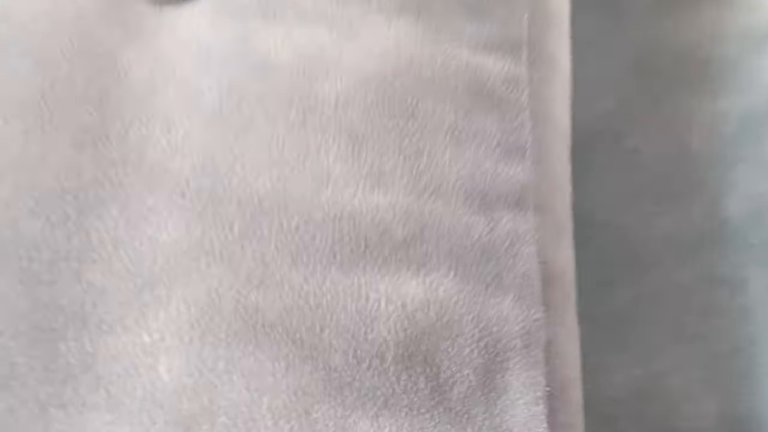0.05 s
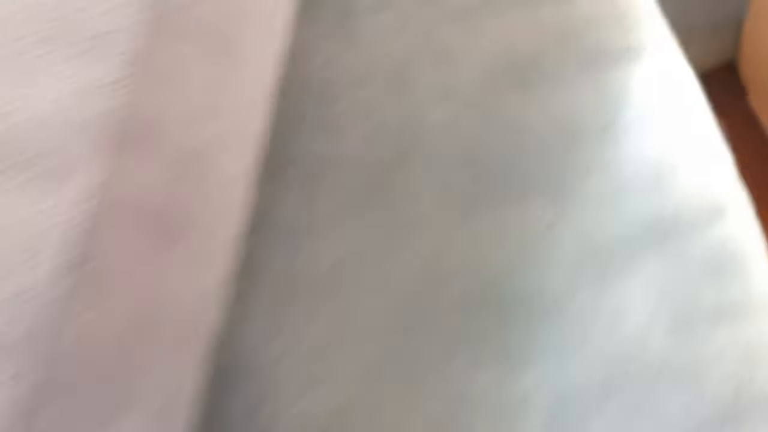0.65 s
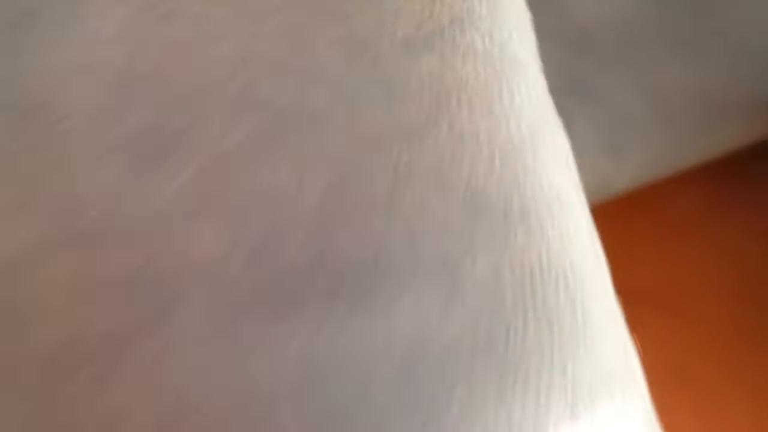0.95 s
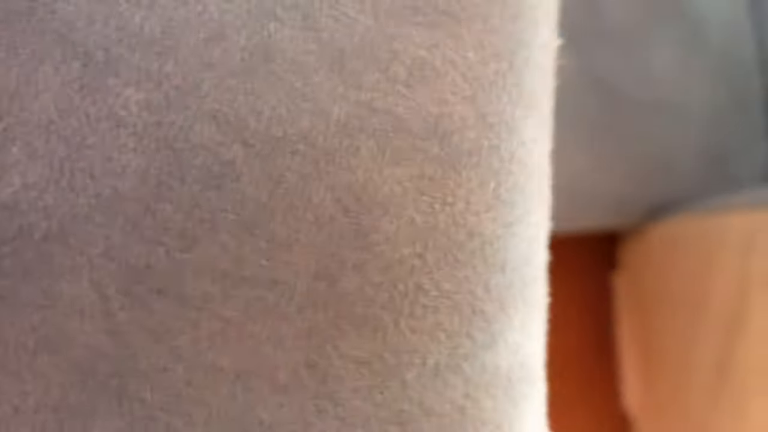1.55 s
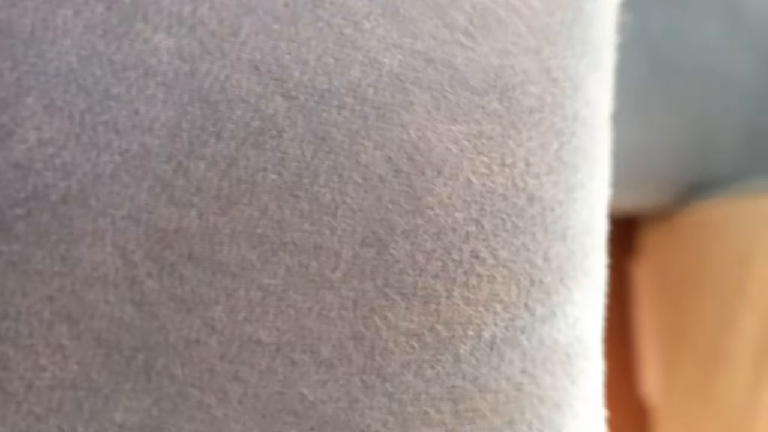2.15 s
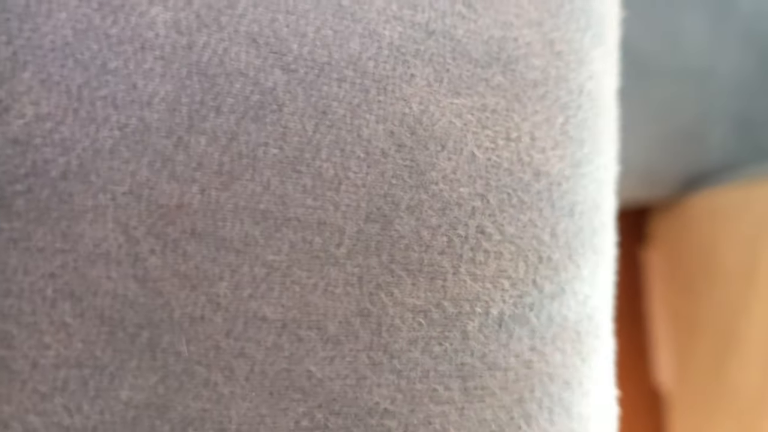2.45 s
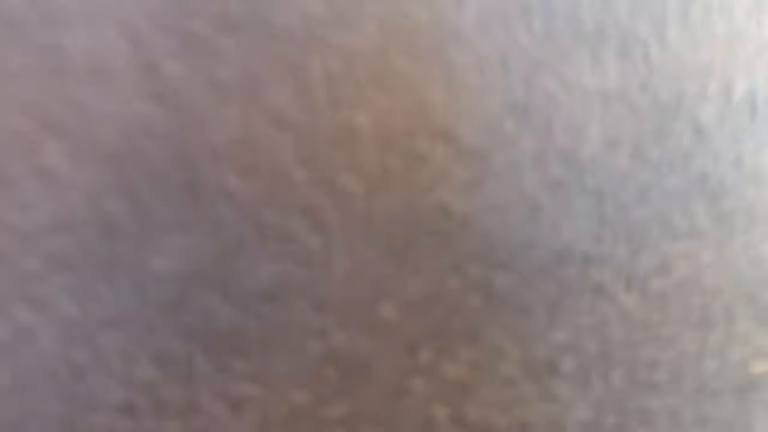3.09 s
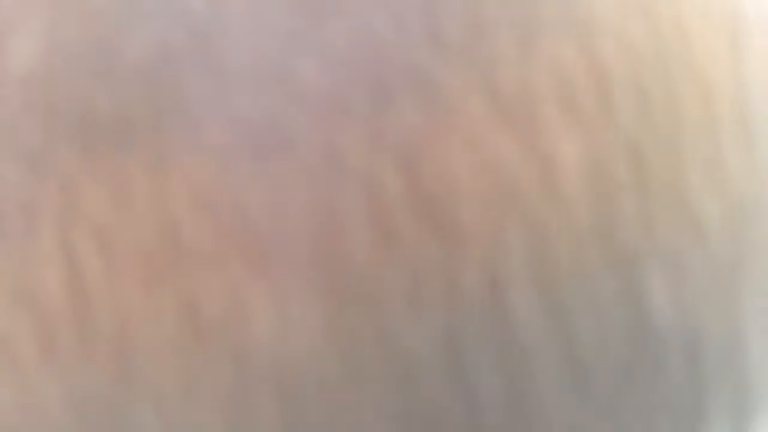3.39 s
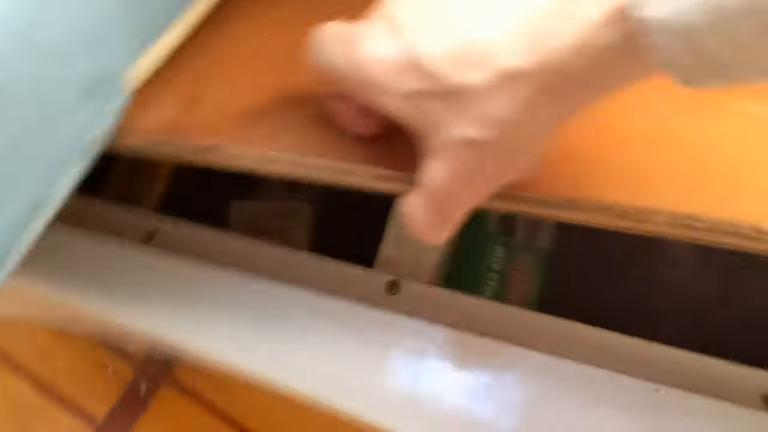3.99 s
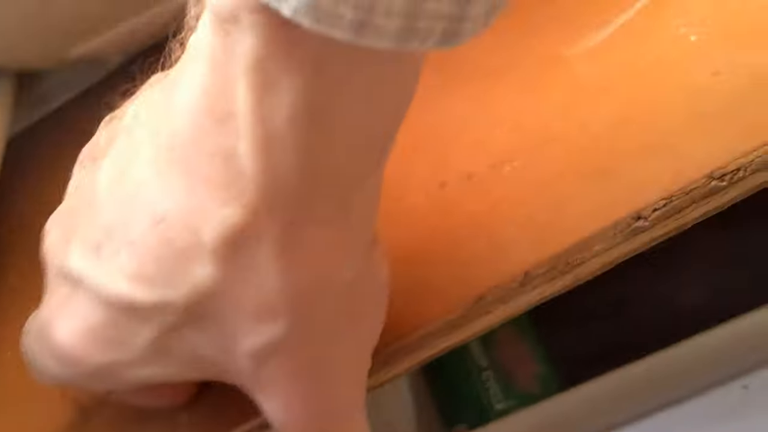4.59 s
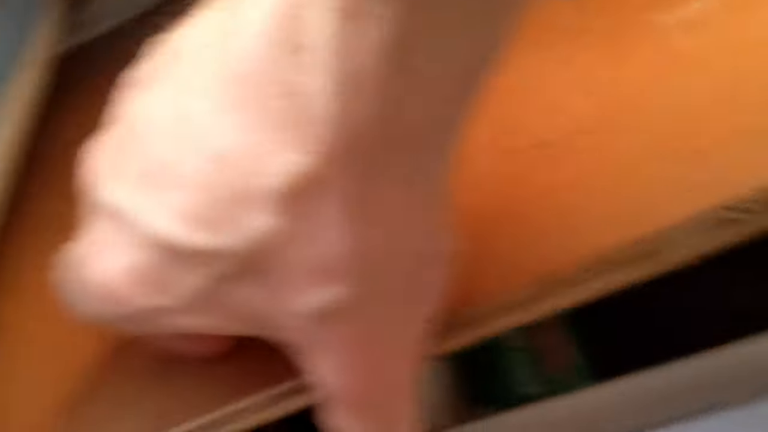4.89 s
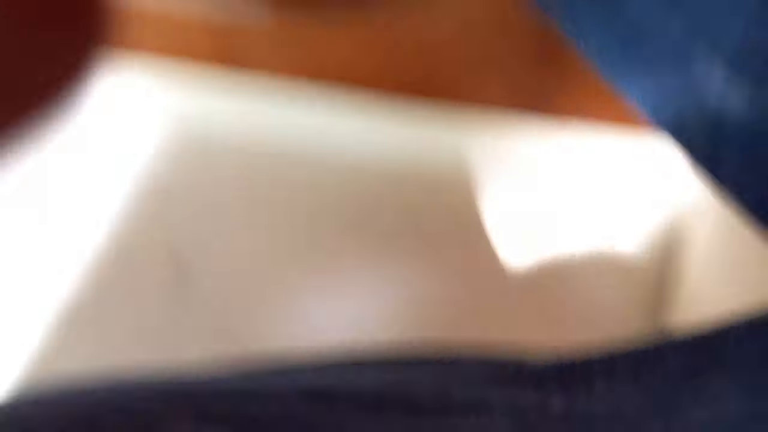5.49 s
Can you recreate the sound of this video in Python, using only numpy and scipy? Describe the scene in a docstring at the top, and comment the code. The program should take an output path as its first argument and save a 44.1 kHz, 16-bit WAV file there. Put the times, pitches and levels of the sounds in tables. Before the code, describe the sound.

Fingers tap and suede brushes close to the microphone while a plywood cover knocks and scrapes in a small boat cabin.

```python
"""A small boat cabin: a hand-held phone brushes past a suede cushion while a plywood locker cover
is pulled up. Fingers tap, tick and slip on the phone's case, ringing it close to the microphone.
The cover knocks and scrapes in its frame, the hollow under it booms and the cabin answers briefly.
Suede hisses over the microphone ports, the cushion rustles and the moving hand adds a low rumble."""
import sys
import numpy as np
from scipy import signal
from scipy.fft import rfft, irfft, next_fast_len
from scipy.io import wavfile
from scipy.ndimage import uniform_filter1d

SR = 44100
rng = np.random.default_rng(int(sys.argv[2]) if len(sys.argv) > 2 else 0)


def to_wav(sig):
    """Store sig (one row per channel, or 1-D mono) as 16-bit WAV at the path in sys.argv[1].

    Samples outside -1..1 are clipped; the rate is SR.
    """
    pcm = np.clip(np.atleast_2d(sig), -1, 1) * 32767
    pcm = np.round(pcm).astype(np.int16)
    wavfile.write(sys.argv[1], SR, pcm.T)  # frames by channels


N = 253089
T = np.arange(N) / SR

# Levels are relative trims; pan is left minus right.
# finger taps on the case: t/s, thud/dB, hollow/dB, clack/dB, clack tilt/(dB per octave), pan/dB
FINGER_TAPS = [(0.215, -23, -32, -58, 0, 3), (1.081, -13, -11.5, -5, -2.5, 3.5),
               (1.585, -56, -61, -37.5, 3, 9), (1.967, -56, -42, -32.5, -7, 5),
               (2.657, -25, 1, -11, -12.5, 8.5), (2.677, -24, -33, -49, -6, 5),
               (2.684, -35, -28, -34, -7, 5), (2.709, -31, -33, -21, -7, 4), (2.757, -44, -33, -21, -10, 4),
               (2.767, -45, -33, -35, -4, 10), (4.178, -48, -50, -23.5, 9, 9),
               (4.183, -25, -48, -12, 1.5, 2), (4.198, -13.5, -28, -9.5, -3.5, 6),
               (4.21, -48, -36, -32, 0, 9), (4.252, -28.5, -58, -50, 0, 18),
               (4.383, -9, -27, -10, -2.5, 6.5), (4.52, -35, -51, -29, 2, 4.5),
               (4.56, -25, -45, -35, -6, 12), (4.68, -32, -59, -33.5, -5, 7),
               (4.786, -30.5, -57, -20, 2, 5), (4.91, -40, -53, -35, 0, 0), (4.921, -33, -39, -31, -7, 6),
               (5.307, -26.5, -35, -37, -6, 8), (5.39, -21, -46, -23, 7, 6),
               (5.435, -13.5, -48, -22.5, 0.5, 9.5), (5.593, -43.5, -47, -24.5, 4, 7),
               (5.626, -12.5, -22.5, -22.5, 1, 10)]
# modes of the case: f/Hz, level/dB, t60/s, voice (0 thud, 1 hollow, 2 clack)
CASE_MODES = [(164, -7, 0.045, 0), (247, 4.5, 0.017, 0), (513, -4.5, 0.015, 1), (683, -15, 0.016, 1),
              (843, 0.5, 0.012, 2), (1414, 4, 0.0089, 2), (1810, 4, 0.0072, 2)]
# nails and seams catching the rim: t/s, level/dB, body/dB, edge/dB, top/dB, pan/dB
RIM_TICKS = [(0.8139, -21, -3, -19.5, -36, 3.5), (2.7085, -19, -8, -19, -44, -9),
             (2.7134, -33, -3.5, -14, -28, -13), (2.7229, -32, -7, -13, -31, -14),
             (2.7278, -29.5, -12, -7.5, -32, -7), (2.756, -29.5, -6.5, -19, -43, -12),
             (3.5679, -30, -3, -16, -18, 9), (3.867, -19, -0.5, -11.5, -18.5, 1),
             (3.905, -31, -18, -28, -11, 3.5), (4.1832, -17.5, -6.5, -15, -31, 17),
             (4.1973, -27.5, -9, -12.5, -25, 21), (4.3829, -16.5, -17, -20, -22, 9.5),
             (4.408, -23.5, -35, -10, -27, 8), (4.9213, -11, -35, -16, -20.5, 14)]
# modes of the case's rim: f/Hz, t60/s, voice (0 body, 1 edge, 2 top)
RIM_MODES = [(2200, 0.0019, 0), (3680, 0.0032, 0), (3900, 0.0022, 0), (5570, 0.0058, 1), (7340, 0.0042, 1),
             (9870, 0.0053, 2), (11700, 0.0049, 2), (14500, 0.0033, 2)]
# the cover hitting its frame: t/s, level/dB, boom/dB, clap/dB, crack/dB, pan/dB
COVER_KNOCKS = [(0.35, -34, -3, -24, -3, 0), (0.582, -29.5, -35, -12, -27, 0.5),
                (1.341, -35.5, 5.5, -19, -27, -0.5), (1.434, -30, -7, -10, -20.5, -0.5),
                (1.541, -27.5, -4, -8, -37, 0.5), (2.005, -29, -13, -3, -9.5, 1.5),
                (2.147, -33.5, -33, -6, -28, 1.5), (2.378, -7, -13, -25, -47, -0.5),
                (2.612, -24, -11, -18, -17.5, 0), (2.824, -26.5, -12.5, -15.5, -21, -0.5),
                (3.045, -24.5, -24, -5.5, -2, -1.5), (3.196, -25, -13, -3.5, -7, 0.5),
                (3.212, -26.5, 1, -35, -9.5, -1), (3.865, -17, -12.5, -4, -0.5, 1.5),
                (4.976, -25, -13, -9, -14, 1.5), (5.106, -19, -16.5, -6, -6, 1.5),
                (5.174, -29, -9.5, -10, -33, 0), (5.511, -17, -29, -14, -17, 2),
                (5.715, -14.5, -29, -5, -9, 2.5)]
# modes of the plywood cover: f/Hz, level/dB, t60/s
COVER_MODES = [(161.6, -14, 0.25), (189.6, 3, 0.13), (223.4, -8.5, 0.22), (270.5, -8, 0.14),
               (310.1, -9.5, 0.28), (345, -6, 0.17), (420, -19, 0.073), (544, -7.5, 0.1)]
# scrapes of the cover: peak t/s, rise/s, fall/s, groan/dB, rasp/dB, squeak/dB
COVER_SCRAPES = [(2.452, 0.0089, 0.053, -35.5, -62, -48), (2.532, 0.024, 0.036, -43.5, -53, -48),
                 (3.36, 0.085, 0.058, -36, -62, -50.5), (3.478, 0.096, 0.082, -30, -52.5, -42.5),
                 (3.572, 0.12, 0.08, -30.5, -45.5, -42.5), (3.605, 0.042, 0.064, -38, -48, -35.5),
                 (3.7, 0.04, 0.046, -62, -66, -42.5), (3.82, 0.13, 0.11, -37, -46, -77),
                 (3.93, 0.015, 0.066, -31.5, -60, -68), (4.03, 0.22, 0.16, -40, -46, -58),
                 (4.26, 0.02, 0.061, -56, -68, -46)]
# strokes of suede over the phone: peak t/s, rise/s, fall/s, level/dB, pan/dB
SUEDE_STROKES = [(0.12, 0.24, 0.33, -49, 1.5), (0.96, 0.77, 1, -46, 1), (1.939, 0.52, 0.31, -50, 10),
                 (2.32, 0.18, 0.14, -54.5, 2.5), (3.06, 0.18, 0.13, -53, 7), (3.31, 0.36, 0.26, -52.5, 7.5),
                 (3.6, 0.38, 0.57, -50, 1.5), (4.0, 0.28, 0.26, -50, 0.5), (4.23, 0.2, 0.34, -49, 9),
                 (4.4, 0.29, 0.22, -52.5, 4), (4.7, 0.34, 0.66, -58.5, -0.5), (4.95, 0.12, 0.41, -53, 6),
                 (5.12, 0.22, 0.38, -50.5, 0), (5.64, 0.17, 0.18, -43, 4)]
# tone of rubbed suede: f/Hz, level/dB
SUEDE_EQ = [(410, -9.5), (700, 2.5), (1020, -3), (1420, -19), (1560, -4.5), (2050, -5), (3370, -0.5),
            (4860, -5), (5690, 2.5), (6570, -6.5), (9350, -4), (10800, -5), (12000, -4), (15200, -2),
            (16000, -33)]
# bright sheen of fast brushing: f/Hz, level/dB
SHEEN_EQ = [(3000, -38), (7500, 14), (9700, 22.5), (10800, 12), (12000, 25), (15000, -23), (17000, -39)]
# the cushion giving way: peak t/s, rise/s, fall/s, level/dB
CUSHION_SHIFTS = [(0.08, 0.13, 0.13, -49), (0.43, 0.24, 0.065, -46.5), (0.71, 0.13, 0.11, -51.5),
                  (0.98, 0.19, 0.61, -47), (1.67, 0.035, 0.1, -49.5), (2.32, 0.081, 0.29, -49),
                  (2.72, 0.11, 0.12, -51), (3.85, 1, 0.35, -49.5), (4.45, 0.08, 0.066, -44),
                  (4.72, 0.3, 0.14, -46.5), (5.68, 0.5, 0.5, -37)]
# tone of rustling foam: f/Hz, level/dB
FOAM_EQ = [(50, -42), (80, -1.5), (120, -3), (185, -1), (300, -8.5), (480, -10), (800, -22.5), (1600, -23),
           (3000, -44)]
# jolts of the hand holding the phone: peak t/s, rise/s, fall/s, level/dB
HAND_JOLTS = [(0.72, 0.55, 0.33, -30.5), (1.1, 0.15, 0.3, -32.5), (2.36, 0.11, 0.2, -27.5),
              (2.67, 0.065, 0.068, -32), (4.15, 2.3, 0.98, -39), (5.22, 0.08, 0.31, -34.5),
              (5.47, 0.057, 0.1, -26), (5.63, 0.097, 0.12, -22.5)]
# tone of the handling rumble: f/Hz, level/dB
RUMBLE_EQ = [(10, -4), (24, 1.5), (38, -6.5), (58, -7), (100, -21), (250, -43), (2000, -83)]
# noise floor of cabin and microphones: f/Hz, level/dB
ROOM_TONE_EQ = [(180, 3), (300, 0), (814, -7), (1870, -10.5), (3290, -12.5), (4750, -16), (5700, -47),
                (16000, -70)]


def finger_taps(lag_s=0.00088, thud_delay_s=0.00076, clack_pan_db=4, echo_db=-38, echo_t60=0.2):
    """Dry taps carry through the case, the clack leaning left; the cabin echoes faintly."""
    out = np.zeros((2, N))
    for s, thud_db, hollow_db, clack_db, tilt, pan in FINGER_TAPS:
        thud, hollow, clack = case_rings(tilt)
        air = ports(rng.standard_normal((2, len(thud))), apart_hz=900)
        echo = undb(echo_db) * unit(band(air, 250, 1650)) * fade(T[:len(thud)], echo_t60)
        bass_sides = sides(0.22 * pan)  # the lows stay near the centre
        add(out, s + lag_s, undb(hollow_db) * hollow * bass_sides)
        add(out, s + lag_s, undb(clack_db) * (clack * sides(pan + clack_pan_db) + echo))
        add(out, s + lag_s + thud_delay_s, undb(thud_db) * thud * bass_sides)
    return out


def case_rings(tilt, build_t60=0.0071, top_hz=2133):
    """The case's thud, hollow and clack; the clack tilts with the spot struck."""
    t = T[:SR // 16]
    rings = np.zeros((3, len(t)))
    for k, (hz, db, t60, voice) in enumerate(CASE_MODES):
        gain = undb(db)
        if voice == 2:
            detune, weight = rng.standard_normal(2)
            # neighbouring clack modes start in opposite directions
            gain = gain * (-1) ** k * undb(tilt * np.log2(hz / top_hz) + 2 * weight)
            hz = hz * (1 + 0.045 * detune)
        else:
            gain = gain * (1 - fade(t, build_t60))  # the low modes take a moment to bloom
        rings[voice] += gain * np.sin(2 * np.pi * hz * t) * fade(t, t60)
    soft = signal.ellip(6, 1, 45, top_hz, fs=SR, output='sos')  # a soft fingertip excites no treble
    return [peak(signal.sosfilt(soft, ring)) for ring in rings]


def finger_drag(creak_db=-31.5, squeal_db=-46, pan_db=6):
    """A finger sticks and slips over the case; a lighter rub only sings near one resonance."""
    firm = press(start_s=2.676, end_s=2.742, attack_s=0.0088, release_t60=0.16)
    light = press(start_s=4.675, end_s=4.775, attack_s=0.027, release_t60=0.092)
    slips = ports(grains(per_s=3000, spread_db=1), apart_hz=2500)
    creak = colour(slips, [(90, -16), (300, 13), (500, 8), (800, 1), (1100, 5), (1500, -16),
                           (2000, -9), (2500, -19), (6000, -32)])
    squeal = colour(slips, [(400, -34), (800, -12), (1000, -1), (1250, -21), (2100, -21.5),
                            (3000, -26.5)])
    return (creak * firm * undb(creak_db) + squeal * light * undb(squeal_db)) * sides(pan_db)


def rim_ticks(lag_s=0.001116, echo_db=-29, echo_t60=0.25, body_db=2, edge_db=5, top_db=11):
    """Hard little contacts ping the rim, at its own phase in each port, with a faint cabin tail."""
    out, t = np.zeros((2, N)), T[:SR // 8]
    for s, db, body, edge, top, pan in RIM_TICKS:
        gains = undb(db) * undb([body + body_db, edge + edge_db, top + top_db])
        for hz, t60, voice in RIM_MODES:
            ring = np.sin(2 * np.pi * (hz * t + rng.random((2, 1)))) * fade(t, t60)
            echo = unit(band(rng.standard_normal((2, len(t))), hz * 0.5, hz * 2.1)) * fade(t, echo_t60)
            tick = ring * sides(pan) + undb(echo_db) * echo * sides(pan / 2)
            add(out, s + lag_s, gains[voice] * tick)
    return out


def cover_knocks(lag_s=0.000959, locker_hz=75.8, locker_t60=0.3,
                 wood_db=-3, cabin_db=-15, clap_db=-7, crack_db=-9, snap_db=5):
    """Each blow rings the plywood and the hollow under it; dense cabin reflections follow."""
    out, t = np.zeros((2, N)), T[:SR // 2]
    boom = peak(np.sin(2 * np.pi * locker_hz * t) * fade(t, locker_t60) * (1 - fade(t, t60=0.059)))
    for s, db, low, mid, high, pan in COVER_KNOCKS:
        wood = undb(wood_db) * plywood_ring(t)
        air = ports(rng.standard_normal((2, len(t))), apart_hz=580)
        cabin = undb(cabin_db) * unit(band(air, 113, 490, order=3)) * fade(t, t60=0.23)
        clap = undb(mid + clap_db) * unit(band(air, 465, 1060, order=3)) * fade(t, t60=0.19)
        snap_and_tail = undb(snap_db) * fade(t, t60=0.0066) + fade(t, t60=0.14)
        crack = undb(high + crack_db) * unit(band(air, 1100, 4250)) * snap_and_tail
        add(out, s + lag_s, undb(db) * sides(pan) * (wood + undb(low) * boom + cabin + clap + crack))
    return out


def plywood_ring(t, grip_detune=0.046, apart_hz=700, build_t60=0.0034):
    """The cover's modes, detuned a little by the grip; each reaches the two ports at its own phase."""
    hz, mode_db, t60 = np.transpose(COVER_MODES)[:, :, None]
    detune, skew, scatter_db = rng.standard_normal((3, len(COVER_MODES), 1))
    phase = 2 * np.pi * hz * (1 + grip_detune * detune) * t
    port_phase = hz / apart_hz * skew * np.array([1, -1])[:, None, None]
    polarity = (-1) ** np.arange(len(COVER_MODES))[:, None]
    modes = polarity * undb(mode_db + scatter_db) * np.sin(phase + port_phase) * fade(t, t60)
    return peak(modes.sum(axis=1) * (1 - fade(t, build_t60)))


def cover_scrapes(uneven_db=1.6):
    """The cover's edge scrapes along the frame: dense slips into the plywood, a thin squeak of grit."""
    power = sum(np.outer(undb(levels_db), swell(s, rise, fall)) ** 2
                for s, rise, fall, *levels_db in COVER_SCRAPES)
    groan_gain, rasp_gain, squeak_gain = np.sqrt(power)
    slips = ports(grains(per_s=2600, spread_db=1.5), apart_hz=438) * undb(uneven_db * wander(hz=50))
    groan = colour(slips, [(70, -19), (130, 2), (190, 6), (300, 4.5), (520, -10.5), (900, -18.5),
                           (2000, -79)])
    rasp = colour(slips, [(250, -33), (650, 3), (1000, 5), (1700, 0.5), (2500, -12), (8000, -59)])
    squeak = colour(slips, [(900, -30.5), (2500, -15), (3150, -8.5), (3700, -17), (5500, -26),
                            (12000, -31)])
    return groan * groan_gain + rasp * rasp_gain + squeak * squeak_gain


def suede_brush(trim_db=3.5, flick_db=-11, sheen_db=-6, brisk_db=-47, rest_db=-64, uneven_db=1.35):
    """Fibres flick each port on its own, louder with speed; a brisk stroke adds a bright sheen."""
    strokes = sum((undb(db) * swell(s, rise, fall) * sides(pan)) ** 2
                  for s, rise, fall, db, pan in SUEDE_STROKES)
    speed = np.sqrt(strokes + (undb(rest_db) * sides(pan_db=6)) ** 2)
    briskness = np.sqrt(speed.prod(axis=0)) / undb(brisk_db)
    fibres = rng.standard_normal((2, N)) + undb(flick_db) * unit(grains(per_s=1700, spread_db=4.5))
    sheen = colour(rng.standard_normal((2, N)), SHEEN_EQ) * undb(sheen_db) * briskness
    return (colour(fibres, SUEDE_EQ) + sheen) * speed * undb(trim_db + uneven_db * wander(hz=25.18))


def cushion_rustle(trim_db=3, uneven_db=3):
    """The foam rustles unevenly as it gives way."""
    foam = colour(ports(grains(per_s=1800, spread_db=0), apart_hz=696), FOAM_EQ)
    return foam * undb(trim_db + uneven_db * wander(hz=30)) * movements(CUSHION_SHIFTS, rest_db=-55.5)


def hand_rumble():
    """The moving hand shakes the phone: deep noise that swells with each jolt."""
    shake = colour(ports(rng.standard_normal((2, N)), apart_hz=252), RUMBLE_EQ)
    return shake * movements(HAND_JOLTS, rest_db=-47.5)


def room_tone(floor_db=-63):
    """The faint steady hiss of cabin and microphones."""
    return undb(floor_db) * colour(ports(rng.standard_normal((2, N)), apart_hz=800), ROOM_TONE_EQ)


def swell(peak_s, rise_s, fall_s, depth_db=19, roundness=1.35):
    """Envelope of one movement: up by depth_db over rise_s, down by as much over fall_s."""
    away = np.maximum((peak_s - T) / rise_s, (T - peak_s) / fall_s)
    return undb(-depth_db * np.minimum(away, 10) ** roundness)


def movements(rows, rest_db):
    """Envelope of several movements on top of a light resting contact."""
    power = sum((undb(db) * swell(s, rise, fall)) ** 2 for s, rise, fall, db in rows)
    return np.sqrt(undb(rest_db) ** 2 + power)


def press(start_s, end_s, attack_s, release_t60):
    """Envelope of a steady pressure: attack, hold, release."""
    return np.clip((T - start_s) / attack_s, 0, 1) * fade(np.maximum(T - end_s, 0), release_t60)


def fade(t, t60):
    return np.exp(-np.log(1000) * t / t60)


def wander(hz):
    """Smooth random modulation, rms 1."""
    step = int(SR / hz)
    return unit(uniform_filter1d(np.repeat(rng.standard_normal(N // step + 1), step), step)[:N])


def grains(per_s, spread_db):
    """Two rows of tiny slips at random times and of uneven size."""
    slips = (rng.random((2, N)) < per_s / SR) * rng.standard_normal((2, N))
    return slips * undb(spread_db * rng.standard_normal((2, N)))


def band(x, lo_hz, hi_hz, order=2):
    edges = [lo_hz, min(hi_hz, SR / 2 - 500)]
    return signal.sosfilt(signal.butter(order, edges, 'band', fs=SR, output='sos'), x)


def colour(x, points):
    """EQ a sound through (f/Hz, level/dB) points; rms 1."""
    hz, db = np.transpose(points)
    size = next_fast_len(N)
    f = np.maximum(np.fft.rfftfreq(size, 1 / SR), 1)
    curve = undb(np.interp(np.log(f), np.log(hz), db))
    return unit(irfft(rfft(x, size) * curve, size)[..., :N])


def ports(x, apart_hz):
    """Two unrelated sounds become a close microphone pair: mono in the bass, wide above apart_hz."""
    side = signal.sosfilt(signal.butter(1, apart_hz, 'high', fs=SR, output='sos'), x[1])
    return np.array([x[0] + side, x[0] - side])


def sides(pan_db):
    """Left and right gains."""
    return undb(np.array([[.5], [-.5]]) * pan_db)


def undb(db):
    return 10 ** (np.asarray(db) / 20)


def unit(x):
    return x / np.sqrt(np.mean(x ** 2))


def peak(x):
    return x / np.abs(x).max()


def add(out, s, sound):
    i = int(s * SR)
    out[:, i:i + sound.shape[-1]] += sound[..., :N - i]


def scene():
    """Fingers up front, then the cover, over a bed of cloth, rumble and room tone."""
    fingers = finger_taps() + finger_drag() + rim_ticks()
    cover = cover_knocks() + cover_scrapes()
    return fingers + cover + suede_brush() + cushion_rustle() + hand_rumble() + room_tone()


def record(dry):
    """The phone clips at full scale and cuts the top."""
    high_cut = signal.ellip(8, .2, 70, 16100, fs=SR, output='sos')
    return signal.sosfilt(high_cut, np.clip(dry, -1, 1))


dry = scene()
out = record(dry)
to_wav(out)
```